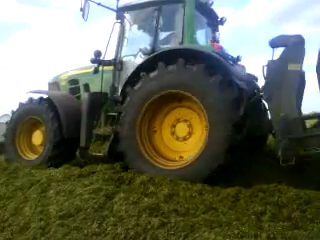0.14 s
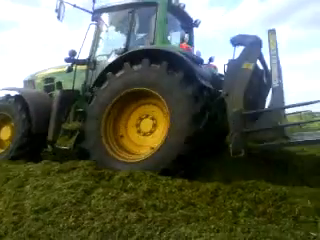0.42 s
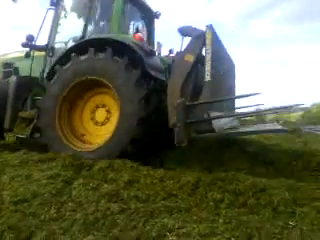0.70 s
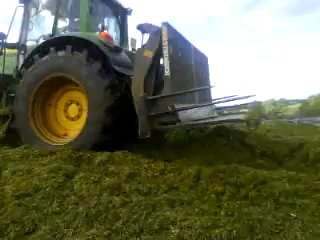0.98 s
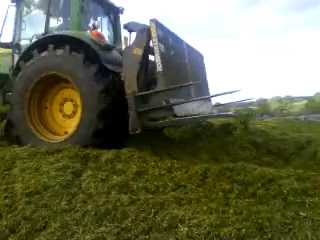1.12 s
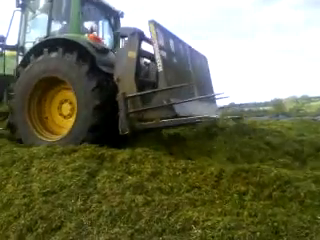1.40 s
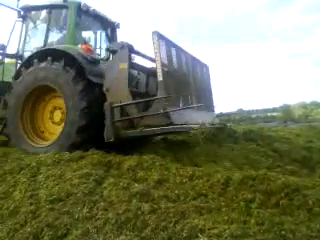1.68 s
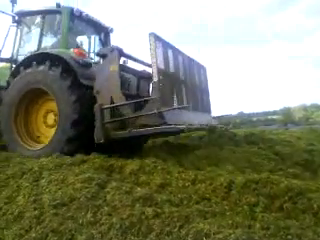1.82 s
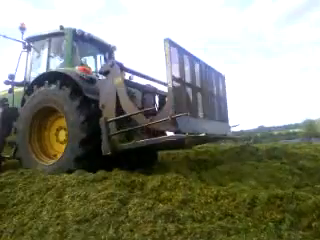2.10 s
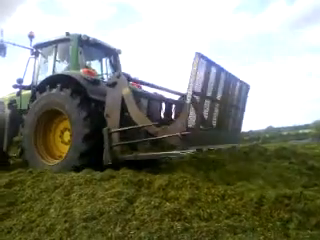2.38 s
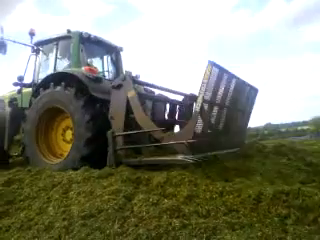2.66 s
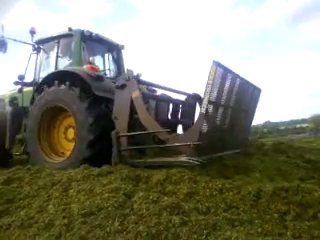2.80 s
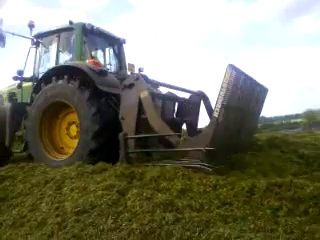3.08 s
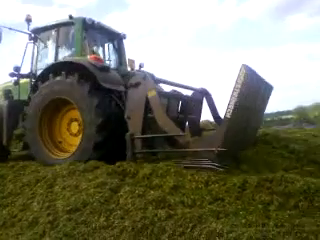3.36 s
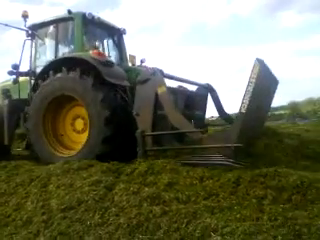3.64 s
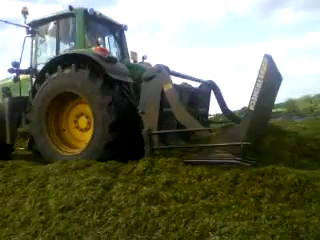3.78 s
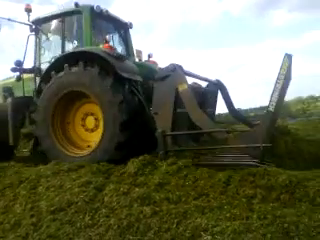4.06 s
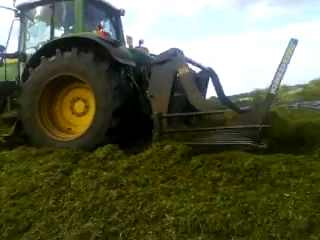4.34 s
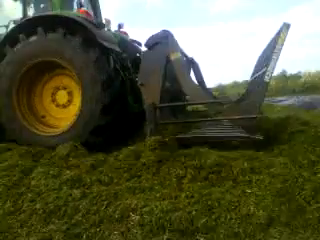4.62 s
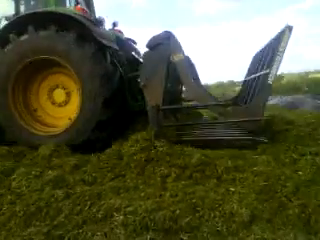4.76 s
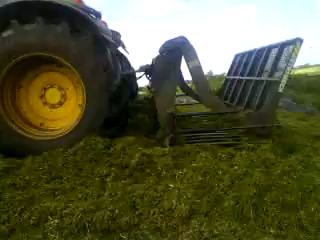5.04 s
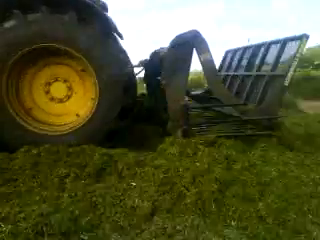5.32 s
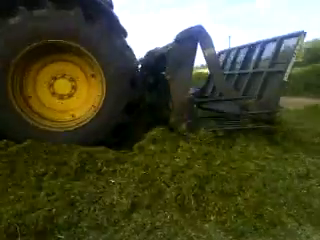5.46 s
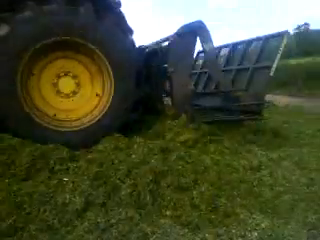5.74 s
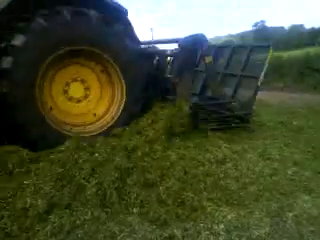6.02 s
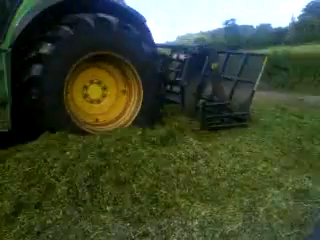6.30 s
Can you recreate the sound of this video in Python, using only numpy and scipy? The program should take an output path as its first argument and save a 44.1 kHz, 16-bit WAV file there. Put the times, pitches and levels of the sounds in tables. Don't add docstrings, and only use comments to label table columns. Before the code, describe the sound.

Outdoors, a few metres from a six-cylinder diesel tractor, through a small microphone with dull, grainy treble. It begins with a steady low engine roar, a hum of gears and a thin hiss, plus one light metal jolt at 0.2 s. From 0.6 s the gear hum drops out and a loose steel rake shakes: hollow frame knocks, rubbing bars and bright tine clanks in irregular bursts, with hard knocks near 0.9 and 1.5 s and the sharpest clatter at 2.0 to 2.5 s. The engine ducks beneath them. Around 2.7 s a last rattle gives way to a shuddering, throbbing engine, which swells until about 4 s into a strong, slightly rising drone with airy intake howl and turbo hiss. A short pump whine climbs at 4.5 s. The drone stays loud; scrapes and a clank come at 5.8 to 6.4 s as engine speed sags.

```python
import sys
import numpy as np
from scipy import signal
from scipy.fft import dct
from scipy.io import wavfile
from scipy.ndimage import uniform_filter1d, minimum_filter1d

SR = 44100
rng = np.random.default_rng(int(sys.argv[2]) if len(sys.argv) > 2 else 0)


def boost(x):
    u = np.asarray(x, float) / 20
    return 10 ** u


def persist_wave(psi):
    counts = np.round(np.clip(psi, -1, 1) * 32767).astype(np.int16)
    wavfile.write(sys.argv[1], SR, np.atleast_2d(counts).T)


N = 283992
T = np.arange(N) / SR

# (time [s], firing rate [Hz])
FIRING_RATE = [(0, 72), (.6, 71), (.75, 70), (1.1, 73.5), (1.6, 74), (2.5, 72), (2.9, 75), (3.25, 77),
               (3.6, 79.5), (3.9, 80.8), (4.3, 81), (4.75, 82.2), (5.1, 84.7), (5.5, 85.8), (6.03, 85.5),
               (6.2, 83), (6.38, 79.3), (6.44, 78)]
# (time [s], level [dB])
ROAR_LEVEL = [(0, -19.5), (.6, -20.5), (.72, -21), (1.0, -25), (1.9, -27.5), (2.06, -32), (2.3, -29),
              (2.47, -37.5), (2.9, -36), (3.3, -31.5), (3.8, -24), (4.1, -21.5), (4.7, -21), (5.3, -20),
              (5.8, -19), (6.44, -24.5)]
# (multiple of firing rate [-], level against the drone [dB])
DRONE_ORDERS = [(1.5, -16), (3.5, -20.5), (6, -25.5), (9, -25)]
# (multiple of firing rate [-], level against the throb [dB])
SHUDDER_ORDERS = [(4, -2.5), (5, -5.5)]
# (time [s], frequency [Hz], level [dB])
DRONE_SURGE = [(3.0, 231.1, -35.5), (3.1, 227.3, -30.5), (3.46, 232.7, -35.5), (3.54, 261.1, -37),
               (3.58, 239.1, -40), (3.63, 238.0, -27), (3.66, 233.0, -39.5), (3.74, 240.5, -23.5),
               (3.79, 248.9, -32), (3.84, 242.6, -23), (3.92, 243.6, -26), (3.95, 248.5, -37),
               (4.03, 240.5, -20), (4.19, 240.5, -25.5), (5.35, 254.9, -20.5), (5.99, 254.2, -25),
               (6.29, 245.8, -25), (6.44, 231.4, -20.5)]
# (idle [dB], rolling [dB], load [dB], shudder [dB],
# speed [dB per Hz], sag [dB per Hz]); third order, firing rate, second order, then three noise regions
DRONE_EFFORT = (-15, -5, 12.5, -0.5, -0.1031, 0.68)
THROB_EFFORT = (-22.5, -2.5, -1, 14.5, 0.5, -1.5)
SECOND_EFFORT = (-23.5, 14.5, 5.5, 8.5, 0.14, -2.5)
THUD_EFFORT = (-23.5, 7, -3.5, 13, 0.58, 1.5)
EXHAUST_EFFORT = (-3, -0.5, -3.5, 4, 0.16, 1)
FAN_EFFORT = (-12.5, 4, -2.5, 3.5, 0.678, -0.02)
# (frequency [Hz], density [dB per Hz])
THUD_SPECTRUM = [(14, -15), (25, -16), (50, -7.5), (70, -7), (100, -1.5), (130, -5)]
# (frequency [Hz], density [dB per Hz])
EXHAUST_SPECTRUM = [(65, -46), (110, -10), (135, 2), (194, -2), (237, 3.5), (275, 0), (600, -7.5),
                    (780, -14.5), (1320, -120)]
# (frequency [Hz], density [dB per Hz])
BLOCK_SPECTRUM = [(210, -26.5), (350, 0.5), (454, -10.5), (746, 1), (927, -4), (1240, -1.5), (1700, -6.5),
                  (1900, -10), (2350, -10.5), (2800, -19.5), (3640, -24), (6160, -120)]
# (frequency [Hz], density [dB per Hz])
FAN_SPECTRUM = [(1060, -24.5), (1800, 5.5), (2000, -7.5), (2350, -14), (3020, 5.5), (3610, -12),
                (4660, -5.5), (5240, -13.5), (6800, -19), (8840, -55.5), (15000, -120)]

# (frequency [Hz], level [dB], decay time t60 [s])
FRAME_MODES = [(409, -12, .08), (548, -13, .08), (612, -3, .11), (640, -4, .1), (668, 0, .17),
               (705, -3, .11), (742, -2, .12), (797, -3, .17), (850, -8, .08), (1270, -10, .08)]
# (frequency [Hz], level [dB], decay time t60 [s])
TINE_MODES = [(964, -9, .07), (1290, -3, .1), (1380, -3, .07), (1445, -2, .08), (1510, -3, .07),
              (1700, -6, .05), (1857, -2, .14), (2025, -3, .07), (2196, -3, .08), (2320, -5, .05),
              (2470, -5, .07), (2820, -9, .05), (3009, -8, .07), (3402, -11, .05), (3558, -11, .05),
              (4328, -15, .04), (4780, -15, .04), (5340, -20, .03)]
# (frequency [Hz], density [dB])
CRASH_SPECTRUM = [(300, -26), (530, -7.5), (640, 7), (1500, 3), (2300, 4), (3000, -3), (3700, -3.5),
                  (4800, 1.5), (5800, -12), (6500, -19.5), (7500, -38.5), (9000, -48)]
# (time [s], length [s], level [dB], colour [Hz])
FRAME_JOLTS = [(0.182, .03, -23.5, 697), (0.642, 0.07, -20.5, 694), (0.753, 0.019, -18.5, 646),
               (0.779, 0.076, -26.5, 623), (0.884, 0.051, -19.5, 706), (0.977, 0.062, -31, 694),
               (1.121, 0.03, -23, 716), (1.152, 0.04, -22, 767), (1.224, 0.078, -25, 726),
               (1.277, 0.04, -29.5, 720), (1.315, 0.054, -26, 770), (1.385, 0.037, -27, 734),
               (1.436, 0.063, -23, 830), (1.498, 0.034, -26.5, 700), (1.572, 0.05, -34.5, 790),
               (1.791, 0.13, -32.5, 855), (2.129, 0.04, -18.5, 730), (2.232, 0.065, -23, 770),
               (2.294, 0.031, -19.5, 744), (2.467, 0.032, -29.5, 720), (2.775, 0.09, -35.5, 676),
               (5.891, 0.034, -29, 740)]
# (time [s], length [s], level [dB], colour [Hz])
TINE_CLANKS = [(0.566, 0.01, -25.5, 2040), (0.709, 0.032, -31, 2180), (0.778, 0.065, -29.5, 2200),
               (0.9, 0.034, -34, 1390), (1.075, 0.007, -32.5, 2390), (1.455, 0.03, -32, 1030),
               (0.218, 0.12, -29, 2150), (1.961, 0.052, -27, 1870), (2.015, 0.015, -20.5, 1920),
               (2.049, 0.018, -23, 1720), (2.067, 0.011, -26.5, 2280), (2.206, 0.021, -26, 1770),
               (2.355, 0.036, -20.5, 1550), (2.381, 0.042, -25, 1750), (2.41, 0.041, -24, 1920),
               (2.453, 0.011, -30.5, 2100), (2.596, 0.041, -36.5, 1420), (2.71, 0.017, -30, 1980),
               (2.72, 0.012, -31.5, 2300), (2.031, .03, -24, 2590), (1.49, 0.04, -35.5, 2100),
               (2.721, 0.055, -30, 2280), (2.786, 0.15, -47.5, 2280), (3.06, .1, -37.5, 2300),
               (5.948, 0.046, -29.5, 1740)]
# (time [s], length [s], level [dB])
DRY_SCUFFS = [
    (0.634, 0.018, -37),
    (0.855, 0.035, -24),
    (4.599, 0.026, -43),
    (5.849, 0.095, -27),
    (6.147, 0.016, -22.5),
    (6.361, 0.05, -24.5),
]
# (time [s], frequency [Hz], peak level [dB],
# decay time t60 [s])
RINGING_PARTS = [(.553, 2040, -11.5, 0.028), (.637, 5040, -23, 0.017), (.642, 800, -15.5, 0.1),
                 (.79, 2110, -23, .06), (.8, 410, -18.5, 0.058), (1.088, 2300, -21, .05),
                 (1.19, 383, -26, 0.17), (1.35, 402, -24, .2), (1.46, 397, -17, 0.057),
                 (1.478, 1860, -16, .15), (1.51, 1840, -23.5, 0.16), (1.575, 1910, -30.5, 0.46),
                 (1.29, 590, -23, 0.08), (1.971, 4930, -24, 0.016), (2.022, 2000, -7, 0.036),
                 (2.03, 1430, -24, 0.084), (2.04, 3030, -17.5, 0.086), (2.058, 2334, -11, 0.13),
                 (2.06, 1920, -11, 0.15), (2.245, 777, -13, 0.18), (2.358, 1405, -11.5, .1),
                 (2.41, 1542, -9, 0.12), (2.48, 1890, -25, 0.53), (2.603, 1390, -23.5, 0.053),
                 (2.73, 2160, -12, 0.06), (2.732, 2410, -15.5, 0.064), (4.575, 4870, -19, .06),
                 (5.92, 2400, -18, .08), (5.95, 1570, -11.5, 0.067), (6.2, 568, -20, 0.33),
                 (.9, 740, -24, 0.11), (.715, 2330, -21, .05), (.715, 1970, -19, 0.06),
                 (.775, 608, -15.5, 0.13), (.905, 1426, -17, 0.05), (.905, 690, -25, 0.18),
                 (1.14, 940, -24, 0.15), (1.15, 2300, -25, 0.13), (2.137, 1380, -18, 0.076),
                 (2.261, 1890, -16.5, 0.12), (2.044, 1450, -20, 0.11), (2.048, 3580, -18.5, .06),
                 (2.15, 646, -15, 0.05), (2.392, 2000, -8, 0.05), (2.42, 630, -19, 0.058),
                 (2.445, 1920, -16.5, 0.071), (2.694, 2160, -29, 0.055), (2.733, 1970, -21, 0.074),
                 (2.752, 2120, -14, .07), (2.74, 4400, -24.5, 0.1),
                 (2.4, 620, -24, 0.072), (1.8, 650, -15, 0.029), (1.6, 1200, -26, .07),
                 (2.5, 1900, -16.5, .06), (2.1, 645, -17, .06), (2.9, 1400, -36, .05),
                 (2.74, 950, -29, 0.06), (2.5, 440, -21.5, 0.28), (4.9, 1995, -13.5, 0.12),
                 (6.15, 5500, -24, .05), (6.3, 520, -31, 0.27), (2.5, 715, -25, .09),
                 (2.726, 880, -19, 0.099), (0.84, 2400, -21, 0.044), (1.5, 880, -25, .15)]
# (time [s], peak level [dB])
HARD_KNOCKS = [(.913, -2), (1.167, -16), (1.477, -14), (1.48, -5.5), (1.4744, -3.5), (1.494, -5.5),
               (2.0165, -9), (2.05, -9), (2.373, -16), (5.897, -3), (5.909, -7)]
# (time [s], peak level [dB], colour [Hz])
TOUCH_TICKS = [(0.64, -17.5, 4930), (0.708, -20, 4800), (.868, -25, 3040), (1.087, -21, 3100),
               (1.906, -21.5, 2500), (1.971, -21.5, 4840), (1.976, -17, 2000), (2.0148, -20, 4800),
               (2.017, -22, 3700), (2.214, -23, 2000), (2.216, -23, 1200), (2.357, -21.5, 4800),
               (2.368, -11.5, 3300), (2.402, -13.5, 4100), (2.715, -28, 4650), (2.727, -25.5, 3330),
               (2.016, -15, 2430)]
# (time [s], length [s], frequency [Hz], level [dB])
CROSS_BAR = [
    (.643, 0.056, 668, -18.5),
    (.765, .05, 620, -20.5),
    (.815, 0.06, 655, -26),
    (.895, .06, 689, -24),
    (.96, 0.091, 668, -25),
    (1.27, 0.043, 687, -26.5),
    (1.48, 0.064, 661, -27),
    (1.63, .1, 662, -32),
    (2.14, .03, 660, -26.5),
    (2.39, .07, 650.5, -24.5),
]
# (time [s], length [s], frequency [Hz], level [dB])
SHORTER_BAR = [
    (1.13, 0.071, 764, -24),
    (1.3, 0.058, 749, -23),
    (1.43, .055, 800, -25),
    (1.56, 0.11, 790, -31),
    (1.79, .1, 800, -28.5),
    (2.235, 0.057, 777, -21.5),
    (2.3, .035, 720, -31),
]
# (time [s], frequency [Hz], level [dB])
TINE_SQUEAL = [
    (1.465, 1862, -60),
    (1.485, 1862, -25),
    (1.525, 1858, -25),
    (1.56, 1855, -33),
    (1.62, 1852, -30),
    (1.7, 1850, -39),
    (1.85, 1850, -55),
]
# (time [s], peak level [dB])
CHASSIS_BUMPS = [
    (1.361, -36.5),
    (1.499, -37),
    (1.78, -33.5),
    (2.61, -43),
]

# (time [s], frequency [Hz], level [dB])
CLIMBING_BAND = [
    (2.9, 1500, -46),
    (3.3, 1600, -42),
    (3.6, 1620, -38),
    (3.9, 1646, -31),
    (4.2, 1700, -36),
    (4.7, 2002, -42),
    (5.2, 2000, -36.5),
    (5.5, 1990, -33),
    (5.9, 1992, -42),
    (6.44, 1900, -42),
]
# (time [s], frequency [Hz], level [dB])
TURBO_HISS = [
    (0, 4723, -35),
    (.7, 4740, -47),
    (2.6, 4694, -72.5),
    (3.3, 4703, -51),
    (3.8, 4680, -44),
    (4.3, 4696, -47),
    (4.6, 4490, -35.5),
    (5.3, 4320, -43),
    (6.0, 4430, -40.5),
    (6.44, 4370, -59),
]
# (time [s], frequency [Hz], level [dB])
DRIVELINE_HUM = [
    (0, 245.8, -28),
    (.3, 239, -29),
    (.58, 236, -34),
    (.68, 238, -63.5),
]
# (time [s], frequency [Hz], level [dB])
GEAR_HUM = [
    (2.8, 830, -58),
    (2.92, 828, -39),
    (3.36, 836, -38),
    (3.55, 840, -58),
]
# (time [s], frequency [Hz], level [dB])
PUMP_WHINE = [
    (4.3, 1860, -70),
    (4.42, 1930, -34),
    (4.5, 1990, -30),
    (4.62, 2080, -33),
    (4.75, 2150, -70),
]

# (frequency [Hz], rounding step against local level [dB], shelf level [dB])
TREBLE_STEPS = [(2500, -12, 0), (3700, -5, 0), (4800, -1.5, 0.5), (5200, 5.5, 0), (5970, 6.5, 1.5),
                (6530, 9.5, 1), (6700, 8.5, 3), (7096, 8, -4.5), (7440, 15.5, -22.5), (7350, 12, -13.5),
                (7800, 12, -11), (8700, 12.5, -17.5)]
# (start time [s], end time [s])
DULL_SPELLS = [
    (0, .2),
    (.29, .33),
    (1.45, 1.55),
    (2.2, 2.25),
    (4.08, 4.11),
    (5.86, 5.96),
    (6.38, 6.44),
]


def rms_one(x):
    return x / np.sqrt(np.mean(x ** 2) + 1e-20)


def in_time(rows):
    s, *columns = np.transpose(rows)
    return [np.interp(T, s, c) for c in columns]


def ramp(start_s, rise_s):
    return np.clip((T - start_s) / rise_s, 0, 1)


def drift(rate):
    every = 40
    r = np.exp(-2 * np.pi * every * rate / SR)
    noise = rng.standard_normal(N // every + 2002)
    slow = signal.lfilter([1], [1, -2 * r, r * r], noise)[2000:]
    return np.interp(np.arange(N) / every, np.arange(len(slow)), rms_one(slow))


def ring(x, hz, t60):
    r = boost(-60 / (t60 * SR))
    w = 2 * np.pi * hz / SR
    return signal.lfilter([0, np.sin(w)], [1, -2 * r * np.cos(w), r * r], x + 1e-18)


def bandpass(x, low_hz, high_hz):
    return signal.sosfilt(signal.butter(2, [low_hz, high_hz], "band", fs=SR, output="sos"), x)


def coloured(sources, spectrum, patchy_db):
    hz, db = np.transpose(spectrum)
    edges = hz[0] * 2 ** np.arange(0, np.log2(hz[-1] / hz[0]), 1 / 4)
    out = 0
    together = drift(9.5)
    for k, (low, high) in enumerate(zip(edges, edges[1:])):
        band = bandpass(sources[k % 2], low, high)
        level_db = np.interp(np.log(low * high) / 2, np.log(hz), db)
        flicker_db = patchy_db * (.6 * together + drift(9))
        out = out + boost(level_db + flicker_db) * band
    return rms_one(out)


def effort():
    idle_hz = 73
    speed = in_time(FIRING_RATE)[0]
    rolling = 1 - ramp(0.63, .1)
    load = ramp(2.67, 0.61)
    shudder = load * (1 - ramp(2.68, 2.6))
    sag = np.maximum.accumulate(speed) - speed
    controls = np.array([np.ones(N), rolling, load, shudder, speed - idle_hz, sag])
    roar_db = in_time(ROAR_LEVEL)[0]
    layers = np.array([DRONE_EFFORT, THROB_EFFORT, SECOND_EFFORT, THUD_EFFORT, EXHAUST_EFFORT, FAN_EFFORT])
    drone, throb, second, thud, exhaust, fan = roar_db + layers @ controls
    return (drone, throb, second), (thud, exhaust, roar_db, fan)


def engine():
    (drone_db, throb_db, second_db), roar_db = effort()
    turn = np.cumsum(in_time(FIRING_RATE)[0] * (1 + .002 * drift(6))) / SR
    throb_db = throb_db - 7.5 * ramp(5, 0.19)
    out = boost(throb_db + 1.0 * drift(3.4)) * np.sin(2 * np.pi * turn)
    out += boost(second_db + 3 * drift(6)) * np.sin(4 * np.pi * turn + drift(3))

    surge_db = in_time(DRONE_SURGE)[1]
    surge_db = 1.1 * (surge_db - uniform_filter1d(surge_db, size=int(0.85 * SR)))
    out += boost(drone_db + surge_db + .8 * drift(8)) * np.sin(6 * np.pi * turn)
    for multiple, level_db in DRONE_ORDERS:
        phase = 2 * np.pi * multiple * turn + drift(1.6)
        out += boost(drone_db + level_db + 4.6 * drift(3.1)) * np.sin(phase)
    for multiple, level_db in SHUDDER_ORDERS:
        phase = 2 * np.pi * multiple * turn + .5 * drift(2.5)
        out += boost(throb_db + level_db + 2.0 * drift(2.7)) * np.sin(phase)
    out *= np.sqrt(2)

    uneven = boost(2.5 * rng.standard_normal(700))[turn.astype(int)]
    puff = uneven * np.exp(-3 * (turn % 1))
    spectra = (THUD_SPECTRUM, EXHAUST_SPECTRUM, BLOCK_SPECTRUM, FAN_SPECTRUM)
    depths, patches_db = (.1, .15, 0.12, 0.46), (.8, 1.5, 0.78, 1)
    for spectrum, level_db, depth, patchy_db in zip(spectra, roar_db, depths, patches_db):
        gas = rng.standard_normal((2, N)) * (1 + depth * puff)
        out += boost(level_db - 1.0) * coloured(gas, spectrum, patchy_db)
    return out


def shakes():
    jolts = [(s, n, .013, db - 2.5, hz, db - 9.5, 1550, db - 9) for s, n, db, hz in FRAME_JOLTS]
    clanks = [(s, n, .007, db - 10.5, 700, db, hz, db - 2) for s, n, db, hz in TINE_CLANKS]
    scuffs = [(s, n, .007, db - 12, 700, db - 12, 2200, db) for s, n, db in DRY_SCUFFS]
    return jolts + clanks + scuffs


def rake():
    frame_focus_db, tine_focus_db = 160, 14
    out, crash, clatter = np.zeros(N), np.zeros(N), np.zeros(N)
    tail = round(.33 * SR)
    t = np.arange(tail) / SR
    rows = shakes()
    chance = rng.standard_normal((len(rows), 40))
    hits = rng.random(N + tail) < 2500 / SR
    force = boost(2.4 * np.minimum(rng.exponential(1, N + tail), 3))
    contacts = hits * force * rng.choice([-1, 1], N + tail)
    for (s, length, attack, frame_db, frame_hz, tines_db, tines_hz, crash_db), luck in zip(rows, chance):
        i = round(s * SR)
        after = np.maximum(t - length, 0)
        envelope = (1 - np.exp(-t / attack)) * np.exp(-t / length - after / 0.0081)
        blows = envelope * contacts[i:i + tail]
        frame, tines = 0, 0
        for (hz, db, t60), z in zip(FRAME_MODES, luck):
            mode_db = db - frame_focus_db * np.log2(hz / frame_hz) ** 2 + 1.5 * z
            frame = frame + boost(mode_db) * ring(blows, hz, t60)
        for (hz, db, t60), z in zip(TINE_MODES, luck[12:]):
            mode_db = db - tine_focus_db * np.log2(hz / tines_hz) ** 2 + 2.5 * z
            tines = tines + boost(mode_db) * ring(blows, hz, 1.6 * t60)
        busy = round((length + .015) * SR)
        for part, db in ((frame, frame_db), (tines, tines_db)):
            out[i:i + tail] += (boost(db) * part / np.std(part[:busy]))[:N - i]
        rise = boost(crash_db) * (1 - np.exp(-t / 0.006))
        crash[i:i + tail] += (rise * np.exp(-t / (2 * length) - after / 0.044))[:N - i]
        clatter[i:i + tail] += (rise * 0.36 * np.exp(-t / 0.13))[:N - i]
    grit = coloured(rng.standard_normal((2, N)) + 0.14 * contacts[:N], CRASH_SPECTRUM, patchy_db=2.5)
    dull_grit = signal.sosfilt(signal.butter(2, 2880, fs=SR, output="sos"), grit)
    return out + crash * grit + clatter * dull_grit


def tings():
    rub_cycles = 22
    out, tail = np.zeros(N), round(.5 * SR)
    t = np.arange(tail) / SR
    rows = RINGING_PARTS
    for (s, hz, peak_db, t60), rub in zip(rows, rng.standard_normal((len(rows), tail))):
        rub = rub * np.exp(-(t * hz / rub_cycles) ** 2)
        tone = ring(rub, hz, t60)
        tone += .45 * ring(rub, 1.017 * hz, .7 * t60)
        tone += .4 * ring(rub, .95 * hz, .4 * t60)
        i = round(s * SR)
        out[i:i + tail] += (boost(peak_db) * tone / np.abs(tone).max())[:N - i]
    return out


def knocks():
    s, peak_db = np.transpose(HARD_KNOCKS)
    clicks = np.zeros(N)
    clicks[(s * SR).astype(int)] = boost(peak_db) * rng.choice([-1, 1], len(s))
    return ring(clicks, 1100, .0035) + .5 * ring(clicks, 2900, .002)


def ticks():
    out, t = np.zeros(N), np.arange(round(.03 * SR)) / SR
    for (s, peak_db, hz), puff in zip(TOUCH_TICKS, rng.standard_normal((len(TOUCH_TICKS), len(t)))):
        tick = bandpass(puff * np.exp(-t / 0.0032), hz / 1.3, hz * 1.03)
        out[round(s * SR):][:len(t)] += boost(peak_db) * tick / np.abs(tick).max()
    return out


def bar(rows):
    attack_s, release_s, width_hz, steady = .008, 0.019, 35, 2
    flutter = (steady + drift(width_hz) + 1j * drift(width_hz)) / np.sqrt(1 + steady ** 2 / 2)
    tones = 0
    for s, length, hz, db in rows:
        fade = -np.maximum(T - s - length, 0) / release_s
        tones = tones + boost(db - 0.5) * ramp(s, attack_s) * np.exp(fade + 2j * np.pi * hz * T)
    return (flutter * tones).imag


def breathy(rows, width_hz, steady=0):
    hz, level_db = in_time(rows)
    turn = 2 * np.pi * np.cumsum(hz) / SR
    wave = (steady + drift(width_hz)) * np.sin(turn) + drift(width_hz) * np.cos(turn)
    return boost(level_db) * wave / np.sqrt(1 + steady ** 2 / 2)


def sway():
    taps = (rng.random(N) < 900 / SR) * rng.standard_normal((len(FRAME_MODES), N))
    hum = sum(boost(db) * ring(x, hz, 0.85 * t60) for (hz, db, t60), x in zip(FRAME_MODES, taps))
    hanging = ramp(0.62, .03) * (1 - ramp(2.48, 0.45))
    return boost(-36.5 + 0.9 * drift(5)) * hanging * rms_one(hum)


def bumps():
    hz, t60 = 76, 0.3
    out, t = np.zeros(N), np.arange(round(.3 * SR)) / SR
    for (s, peak_db), puff in zip(CHASSIS_BUMPS, rng.standard_normal((len(CHASSIS_BUMPS), len(t)))):
        thump = ring(ring(puff * np.exp(-t / 0.17), hz, t60), 3.1 * hz, 0.042)
        out[round(s * SR):][:len(t)] += boost(peak_db) * thump / np.abs(thump).max()
    return out


def whine(rows):
    hz, level_db = in_time(rows)
    turn = np.cumsum(hz * (1 + 0.0016 * drift(41))) / SR
    return boost(level_db + 1.6 * drift(5.6)) * np.sin(2 * np.pi * turn)


def gain_control(steel):
    duck_from_db, duck_share, duck_s = -21, 1.35, .05
    power = np.abs(uniform_filter1d(steel ** 2, size=int(duck_s * SR)))
    steel_db = 10 * np.log10(power + 1e-12)
    return boost(-duck_share * np.maximum(steel_db - duck_from_db, 0))


def scene():
    struck = rake() + sway() + knocks()
    steel = signal.sosfilt(signal.butter(4, 540, "high", fs=SR, output="sos"), struck)
    steel += tings() + ticks() + bar(CROSS_BAR)
    steel += breathy(TINE_SQUEAL, width_hz=45, steady=1.5)
    mix = gain_control(steel) * engine() + steel + bar(SHORTER_BAR) + bumps()
    mix += breathy(CLIMBING_BAND, width_hz=53) + breathy(TURBO_HISS, width_hz=310)
    mix += whine(DRIVELINE_HUM) + whine(GEAR_HUM) + whine(PUMP_WHINE)
    return mix[None]


def thin_treble(x):
    hop, band_lines = 2816, 16
    count, half = N // hop + 2, hop // 2
    window = np.sin(np.pi * (np.arange(2 * hop) + .5) / (2 * hop))
    padded = np.pad(x, (hop, count * hop - N))
    index = np.arange(count)[:, None] * hop + np.arange(2 * hop)
    a, b, c, d = np.split(padded[index] * window, 4, axis=1)
    lines = dct(np.hstack([-c[:, ::-1] - d, a - b[:, ::-1]]), type=4, norm="ortho")
    hz = (np.arange(hop) + .5) * SR / (2 * hop)
    s = np.arange(count) * hop / SR

    at_hz, step_db, shelf_db = np.transpose(TREBLE_STEPS)
    level = np.sqrt(np.abs(uniform_filter1d(lines ** 2, size=49, axis=1)))
    level = minimum_filter1d(level, size=3, axis=0)
    luck = rng.standard_normal((count, hop // band_lines))
    luck = uniform_filter1d(luck, size=2, axis=0) * np.sqrt(2)
    scatter_db = 4 * np.repeat(luck, band_lines, axis=1)
    step = 1e-9 + level * boost(np.interp(hz, at_hz, step_db, left=-40) + scatter_db)
    lines = np.sign(lines) * np.floor(np.abs(lines) / step + .4) * step
    lines = lines * boost(np.interp(hz, at_hz, shelf_db))
    lost = sum((s > start - .02) & (s < end + .02) for start, end in DULL_SPELLS) > 0
    lines[np.ix_(lost, hz > 7350)] = 0

    u, v = np.split(dct(lines, type=4, norm="ortho"), [half], axis=1)
    frames = np.hstack([v, -v[:, ::-1], -u[:, ::-1], -u]) * window
    return (frames[:-1, hop:] + frames[1:, :hop]).ravel()[:N]


def roll_off(x):
    return signal.sosfilt(signal.butter(12, 8320, fs=SR, output="sos"), x)


def record(dry):
    rounded = .85 * np.tanh(dry / .85)
    mix = thin_treble(rounded[0])[None]
    return roll_off(mix)


dry = scene()
out = record(dry)
persist_wave(out)
```